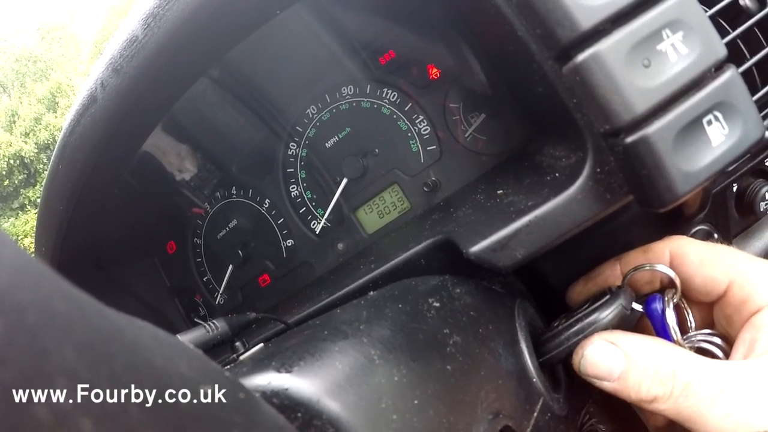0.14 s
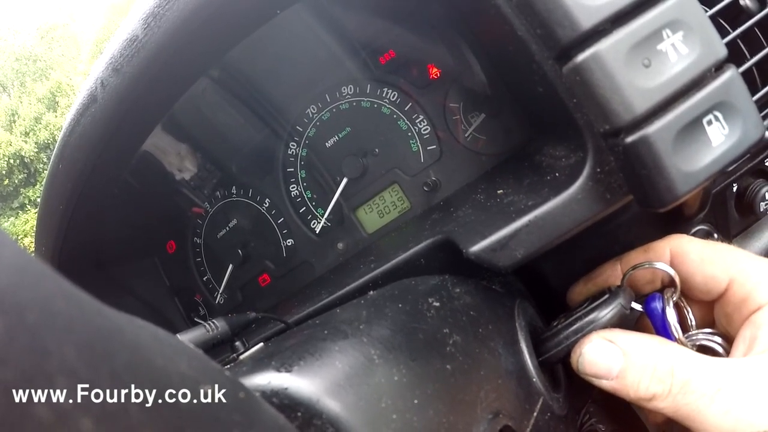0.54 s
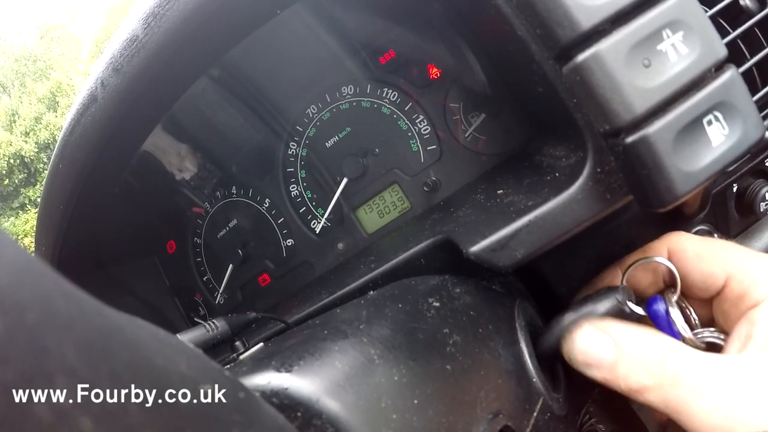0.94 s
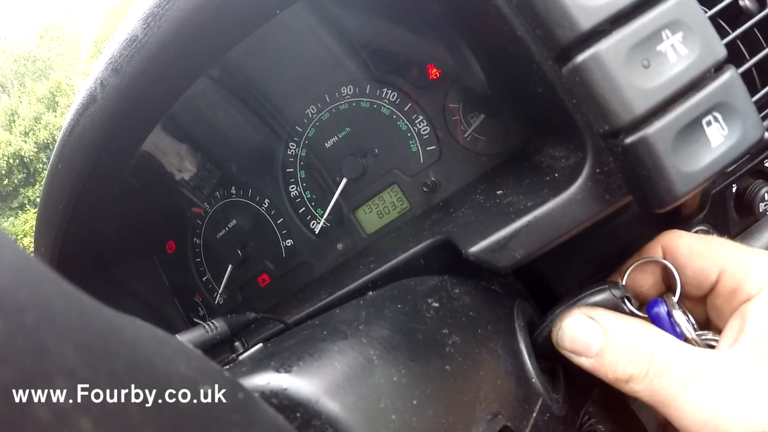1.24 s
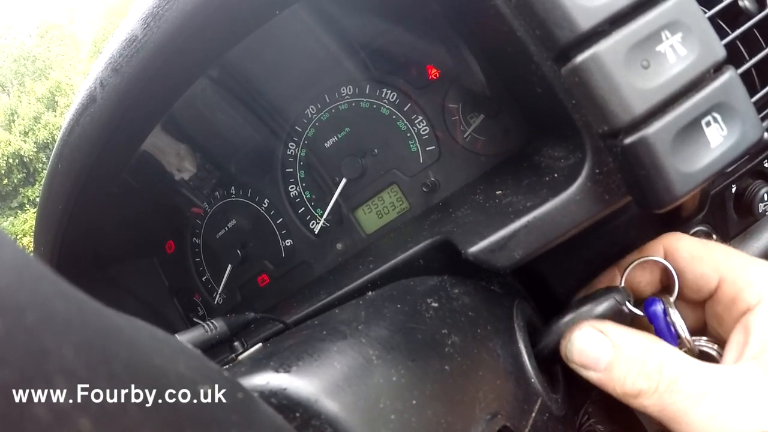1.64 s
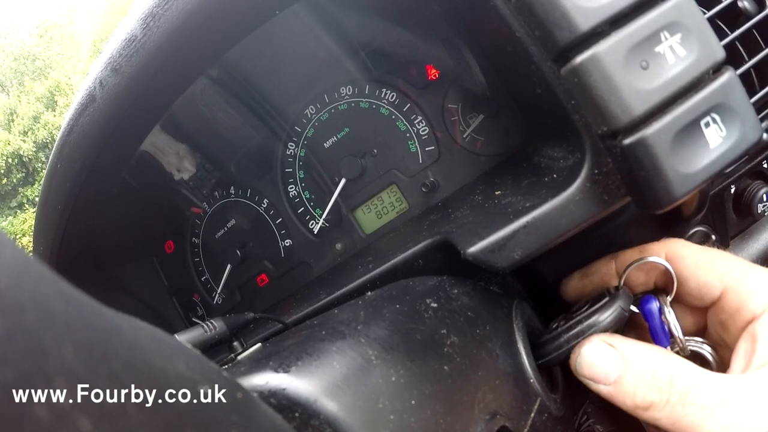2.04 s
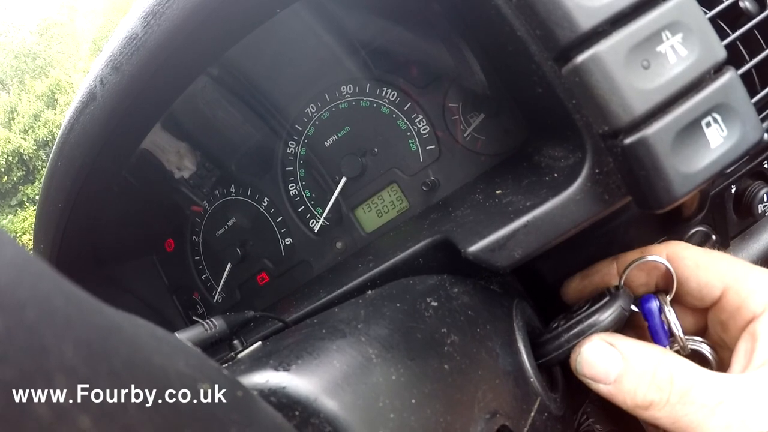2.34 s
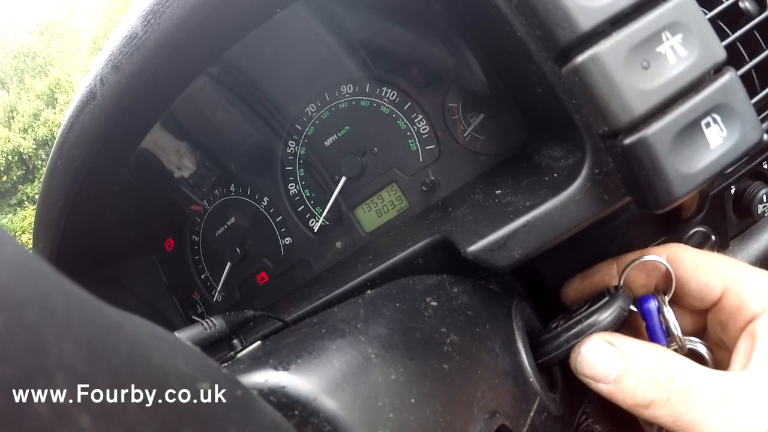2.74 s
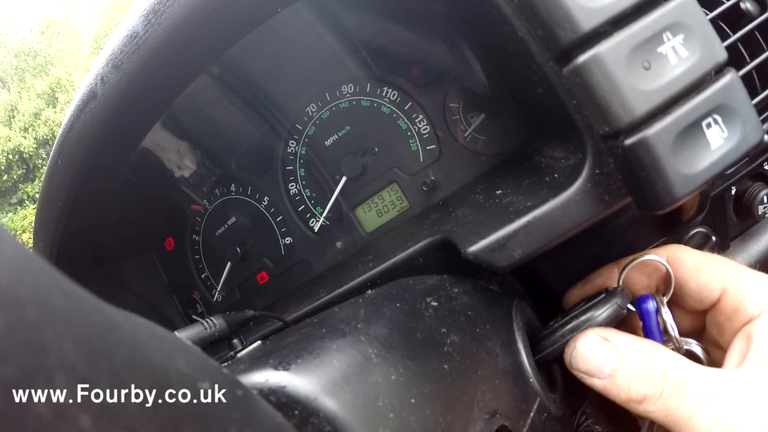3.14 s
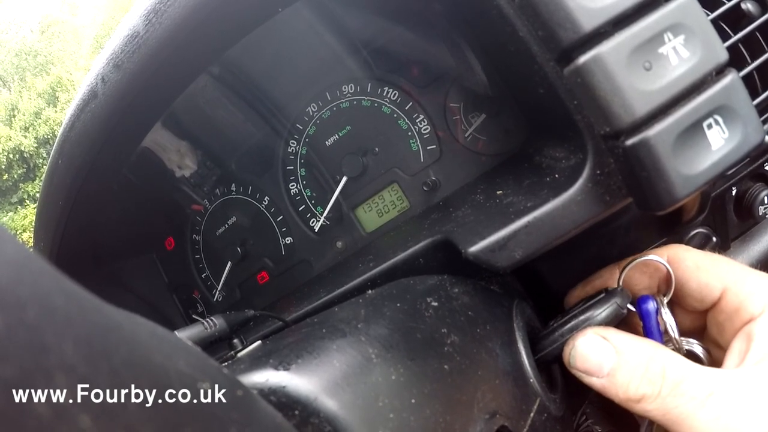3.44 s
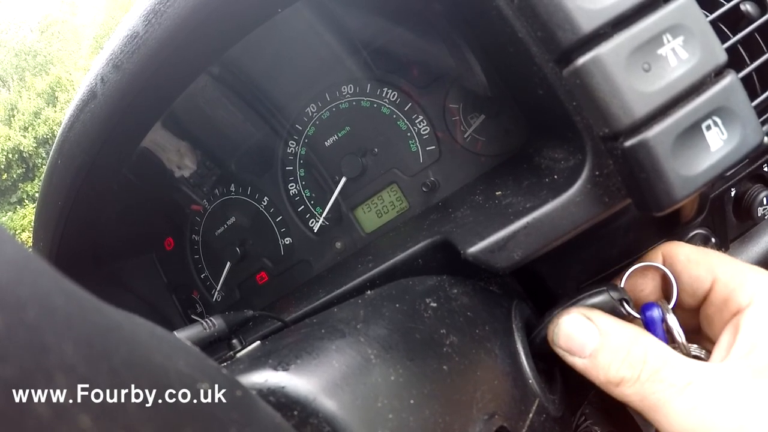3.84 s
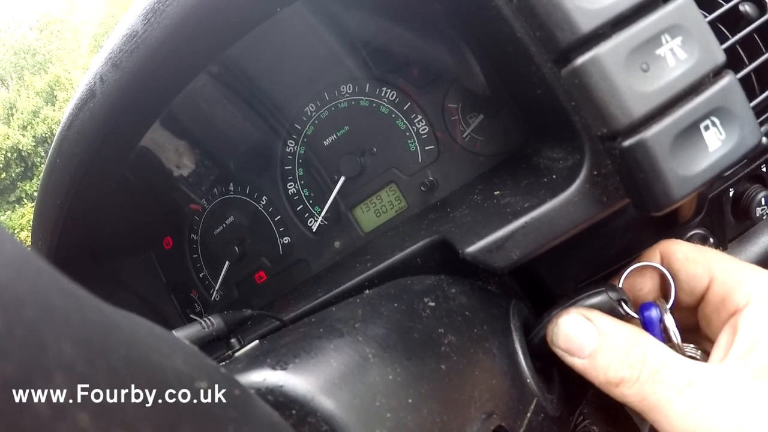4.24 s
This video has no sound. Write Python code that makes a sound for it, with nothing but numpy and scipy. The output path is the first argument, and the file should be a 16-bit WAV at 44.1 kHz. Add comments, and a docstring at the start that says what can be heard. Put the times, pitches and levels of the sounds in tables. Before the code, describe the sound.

Close, dry cabin sound in one channel. A faint rattly buzz of about fifty pulses a second runs, stops after about one second, restarts before two and stops again near four. Each change comes with gritty lock scraping, small metallic key clinks and a low jolt, the last one heaviest. A fifth to a quarter second later a solenoid clicks, hardest and brightest in the middle. Soft background noise and wavering hum.

```python
"""Inside a parked car an ignition key is switched off, on and off again.
A small electric pump buzzes while the ignition is on: each turn knocks its resonances.
Gritty noise makes the lock scrape, ringing modes and ticks make the keys clink and the lock's detent click,
and deep noise thuds. About a fifth to a quarter of a second after each turn a solenoid clicks: a noise crack
and ringing modes. Behind it lie soft noise and a faint low hum."""
import sys
import numpy as np
from scipy import signal
from scipy.fft import rfft, irfft, next_fast_len
from scipy.io import wavfile
from scipy.ndimage import uniform_filter1d

SR = 44100
rng = np.random.default_rng(int(sys.argv[2]) if len(sys.argv) > 2 else 0)


def dump(signal):
    """Clip the signal to [-1, 1] and save it as 16-bit WAV at the path in sys.argv[1]."""
    limited = np.clip(np.atleast_2d(signal).T, -1, 1)
    pcm = np.round(limited * 32767).astype(np.int16)
    wavfile.write(sys.argv[1], SR, pcm)


N = 193025
T = np.arange(N) / SR  # seconds
RING_T = T[:SR // 3]  # time within one short sound, seconds

# The times when the ignition is on and the pump runs; a negative start lies before the sound begins.
# Each row: switched on in seconds, switched off in seconds.
PUMP_RUNS = [(-1.9253, 1.04), (1.76, 3.765)]
# Resonances of the pump and its mounting: a low drone and a high rattle.
# Each row: frequency in Hz, width in Hz, relative level in dB, delay in seconds after each turn's knock.
PUMP_RESONANCES = [(242, 46, -11, 0.0017), (372.7, 35, -4.5, 0.0053), (466, 40, -8, 0.0121),
                   (567, 33.6, 2.5, 0.00995), (680.7, 37, 4, 0.01), (957.7, 51.7, 2, 0.006),
                   (1063, 101, -4.5, 0.0019), (1178, 25, -10, 0.0025), (1467, 38, -9.5, 0.0034),
                   (1771, 19, -6.5, 0.0048), (2001, 66, -3, 0.00396), (2244, 169, -6.5, 0.00206),
                   (2368, 57.5, -2, 0.00051), (2400, 41, -11.5, 0.00742), (2785, 23, -10, 0.0011),
                   (3026, 41, -12, 0.0033), (3152, 600, -19, 0.00113), (3544, 110, -13, 0.0077),
                   (4880, 660, -31, 0.0067), (5130, 810, -30, 0.00044)]
# Turns per second at switch-on and at full speed, time constant of the climb, slowing once switched off
PUMP_START_HZ, PUMP_TOP_HZ, PUMP_CLIMB_S, COAST_HZ_PER_S = 41.15, 51.229, 1.1915, 39
KNOCK_PHASE = .515  # share of a turn at which the knock falls
# Rattle: level at full speed, change with speed, extra level at switch-on and its fading time, decay once off
RATTLE_DB, RATTLE_DB_PER_HZ, SURGE_DB, SURGE_S, RATTLE_T60_S = -56.5, 0.9, 8, 0.47, .42
# Drone: level at full speed, change with speed, decay once off
DRONE_DB, DRONE_DB_PER_HZ, DRONE_T60_S = -60.5, -0.02, 1.3
# The drone is weaker until the pump takes up its load: by how much, for how long, how gradually that ends
UNLOADED_DB, LOAD_AFTER_S, LOAD_RAMP_S = -7.5, .62, 0.04


def pump(on, off, scatter_db=0.9, hiss_db=-17, shaft_db=-61.0):
    """The pump climbs towards full speed, then coasts; each turn knocks its resonances and hisses a little."""
    age = np.maximum(T - on, 0)
    coasting = np.maximum(T - off, 0)
    lacking_hz = (PUMP_TOP_HZ - PUMP_START_HZ) * np.exp(-age / PUMP_CLIMB_S)
    speed = (T >= on) * np.maximum(PUMP_TOP_HZ - lacking_hz - COAST_HZ_PER_S * coasting, 0)
    # turns already made if the pump was running before the sound begins
    gained_hz = PUMP_TOP_HZ - PUMP_START_HZ - lacking_hz[0]
    earlier_turns = PUMP_TOP_HZ * age[0] - PUMP_CLIMB_S * gained_hz
    turns = earlier_turns % 1 + np.cumsum(speed) / SR - KNOCK_PHASE

    # one knock a turn, shared between two neighbouring samples
    knock_at = np.interp(np.arange(int(turns[-1])), turns, np.arange(N))
    sample, part = knock_at.astype(int), knock_at % 1
    force = undb(scatter_db * rng.standard_normal(len(knock_at)))
    knocks = np.bincount(sample, force * (1 - part), N)
    knocks = knocks + np.bincount(sample + 1, force * part, N)
    drone = knocked(knocks, [row for row in PUMP_RESONANCES if row[0] < 820])
    rattle = knocked(knocks, [row for row in PUMP_RESONANCES if row[0] >= 820])

    hiss_colour = [(200, -42), (700, -21), (2300, 8.5), (5000, 1.5), (9000, -7.5), (15000, -34)]
    hiss = np.cos(np.pi * (turns - .2)) ** 2 * noise(hiss_colour)
    shaft = -np.sin(2 * np.pi * turns)

    unloaded = .5 - .5 * np.tanh((age - LOAD_AFTER_S) / (2 * LOAD_RAMP_S))  # 1 falling to 0
    drone_gain = undb(DRONE_DB - DRONE_DB_PER_HZ * lacking_hz + UNLOADED_DB * unloaded)
    surge_db = SURGE_DB * np.exp(-age / SURGE_S)
    rattle_gain = undb(RATTLE_DB - RATTLE_DB_PER_HZ * lacking_hz + surge_db)
    bright = rattle_gain * (rattle + undb(hiss_db) * unit(hiss))
    driven = (bright + undb(shaft_db) * shaft) * decay(coasting, RATTLE_T60_S)
    low = drone_gain * drone * decay(coasting, DRONE_T60_S)
    return (T >= on) * (driven + low)


def knocked(knocks, resonances):
    """Knocks ringing a set of pump resonances; rms near 1 at full speed."""
    response = sum(undb(db) * resonance(hz, width, lag) for hz, width, db, lag in resonances)
    full_speed_rms = np.sqrt(np.sum(response ** 2) * PUMP_TOP_HZ / SR)
    return signal.oaconvolve(knocks, response)[:N] / full_speed_rms


def resonance(hz, width, lag, in_step_s=.0038):
    """One knock's response swells after its lag and dies away; all swing in step at in_step_s, a bright chirp."""
    rate = 2 * np.pi * width
    age = np.maximum(RING_T - lag, 0)
    swelling = 2 / SR * rate ** 2 * age * np.exp(-rate * age)  # gain 1 at the centre frequency
    return swelling * np.sin(2 * np.pi * hz * (RING_T - in_step_s))


# The turns of the key.
# Each row: time in seconds, half length of the scrape in seconds, scrape level in dB,
# jolt level in dB, length of the jolt in seconds.
KEY_TURNS = [(1.1, 0.011, -47, -40, 0.097), (1.77, 0.0098, -49, -42, 0.083),
             (3.836, 0.0066, -43.5, -26, .135)]
# The barrel catches briefly as the hand takes up the slack. Each row: time in seconds, level in dB.
CATCHES = [(0.759, -55), (1.031, -49.5), (1.658, -56.5), (1.74, -49.5), (3.691, -59), (3.755, -52)]
# Tone of the barrel's hollow body. Each row: frequency in Hz, relative level in dB.
SCRAPE_BODY = [(100, 5.5), (220, -1), (300, 7.5), (400, 1.5), (550, 0.5), (850, -4), (1000, 1.5),
               (1250, 2.5), (1500, -2.5), (2000, -8.5), (4000, -34)]
# Tone of the barrel's high rasp. Each row: frequency in Hz, relative level in dB.
SCRAPE_RASP = [(600, 13), (1500, -28), (2100, 8), (3200, 2.5), (4200, -0.5), (5500, -2.5), (7000, -8),
               (8500, -19.5), (15000, -31)]
CATCH_HALF_S, RASP_DB = 0.0084, -4.5  # half length of a catch; rasp against body
# The barrel rubs on softly after each turn: delay, half length, level against the scrape
RUB_LAG_S, RUB_HALF_S, RUB_DB = .02, .022, -9


def lock():
    """The barrel catches, scrapes round and rubs on; each gritty stroke has a hollow body and a high rasp."""
    catches = strokes([(s, CATCH_HALF_S, db) for s, db in CATCHES])
    scrapes = strokes([(s, half, db) for s, half, db, *_ in KEY_TURNS])
    rubs = strokes([(s + RUB_LAG_S, RUB_HALF_S, db + RUB_DB) for s, _, db, *_ in KEY_TURNS])
    body = grit(SCRAPE_BODY, grain_db=3)
    rasp = grit(SCRAPE_RASP, grain_db=-6)
    return (catches + scrapes + rubs) * (body + undb(RASP_DB) * rasp)


# Keys and ring knocking together, and at 3.684 s a dull click of the lock's detent.
# Each row: time in seconds, ring level in dB, tick level in dB, treble lift in dB per octave.
CLINKS_AND_CLICK = [(1.05, -50, -33, -9), (1.073, -47, -52, -11), (1.11, -47.5, -40.5, -13),
                    (1.7662, -45, -38, -2), (1.778, -41, -45, 1), (1.79, -41, -58, 0),
                    (1.81, -37, -34.5, -4.5), (3.6841, -61, -33.5, -24.5), (3.8074, -43.5, -46.5, 1),
                    (3.8957, -56, -53, -6), (3.9305, -55, -60, -12)]
# Ringing modes of the keys. Each row: frequency in Hz, time to fall 60 dB in seconds, relative level in dB.
KEY_MODES = [(2940, 0.044, -20.5), (4350, 0.044, -21), (5420, 0.017, -3.5), (5860, 0.056, -7),
             (6840, 0.03, -14), (9100, 0.025, -29), (10130, 0.084, -19.5), (11200, 0.017, -4),
             (12400, 0.039, -14), (11930, 0.027, -5.5), (13250, 0.029, -20), (14600, 0.048, -21)]
# Tone of the keys sliding along the ring. Each row: frequency in Hz, relative level in dB.
SLIDE_COLOUR = [(500, -10), (2500, -10), (4400, 5), (6800, 2), (8300, -2), (10200, 0.5), (11800, -5),
                (12500, -2), (13900, -8), (14600, -12), (15500, -10)]
REBOUND_S, REBOUND_DB = .0052, -6.5  # every knock bounces once
# A slide follows each knock: delay, half length, level against tick level plus treble lift
SLIDE_LAG_S, SLIDE_HALF_S, SLIDE_DB = 0.012, 0.0057, -11


def keys_and_detent(scatter_db=2.5, tick_t60=0.01):
    """Knock and rebound each tick and ring: keys damped by the hand, their mix of modes set by the point of
    contact, and the detent's dull click made the same way with its treble cut."""
    out = np.zeros(N)
    tick_colour = [(300, -8.5), (1500, -11.5), (2500, -8), (6500, 5), (8300, -4.5), (11500, 3.5), (15500, -1)]
    for s, ring_db, tick_db, lift_db in CLINKS_AND_CLICK:
        # the lift tilts the tick only above 2500 Hz
        lifted = [(hz, db + lift_db * np.log2(max(hz, 2500))) for hz, db in tick_colour]
        for lag, gain in [(0, 1), (REBOUND_S, undb(REBOUND_DB))]:
            ring = np.zeros(len(RING_T))
            for hz, t60, db in KEY_MODES:
                mode_db = db + lift_db * np.log2(hz / 7000) + scatter_db * rng.standard_normal()
                ring += undb(mode_db) * mode(hz, t60, 8.0)
            tick = fade(tick_t60, 0.000082) * noise(lifted, len(RING_T))
            add(out, s + lag, gain * (undb(ring_db) * ring + undb(tick_db) * tick))
    # harder, brighter knocks slide louder; after the dull detent click it is very faint
    slides = strokes([(s + SLIDE_LAG_S, SLIDE_HALF_S, tick_db + lift_db + SLIDE_DB)
                      for s, _, tick_db, lift_db in CLINKS_AND_CLICK])
    return out + grit(SLIDE_COLOUR, grain_db=-5.5) * slides


# The solenoid's clicks. Each row: time in seconds, level in dB, stroke (0 drops out, 1 pulls in).
SOLENOID_CLICKS = [(1.2971, -34, 0), (2.0369, -31, 1), (4.0181, -34.5, 0)]
# Ringing modes of the solenoid and the panel it sits on.
# Each row: frequency in Hz, time to fall 60 dB in seconds, relative level in dB dropping out, then pulling in.
SOLENOID_MODES = [(321.5, 0.14, 2, -5), (368, 0.11, 0.5, -4), (411, 0.059, 0.5, -3), (722, 0.08, -5.5, -19),
                  (919, 0.045, -3.5, -5), (1070, 0.032, 5, -12), (1170, 0.034, 6, -11), (1334, 0.016, 8, 6),
                  (1460, 0.017, 8, -14), (1660, 0.056, -8, -23), (2205, 0.013, -2, -23),
                  (2370, 0.054, -18, -22), (3050, 0.023, -15, -5), (3483, 0.022, -12.5, 1),
                  (4420, 0.017, -7.5, 6), (4720, 0.011, -6.5, 3), (4900, 0.019, -27, -22),
                  (6100, 0.029, -32, -20), (7060, 0.032, -24, -8.5)]
# Tone of the contact's crack: one list for dropping out, one for pulling in.
# Each row of a list: frequency in Hz, relative level in dB.
CRACK_COLOURS = [
    [(150, 10), (600, -6), (1200, 2), (2500, -7), (5000, -11.5), (8000, -22.5), (15000, -35)],
    [(150, 9), (600, -17), (1500, -1), (3200, -7), (5000, 7), (8000, -6), (12000, -15.5), (15500, -14)],
]


def solenoid(build_cycles=6.7, drop_crack_db=-1, pull_crack_db=2, drop_t60=0.053, pull_t60=0.033,
             echo_s=0.02, echo_db=-13):
    """Dropping out is a dull clack, pulling in a hard bright snap; the low panel modes swell last."""
    out = np.zeros(N)
    crack_shapes = [undb(drop_crack_db) * fade(drop_t60, 0.0015), undb(pull_crack_db) * fade(pull_t60, 0.0017)]
    echo_colour = [(80, -16), (160, 29), (380, -19), (600, 21), (1300, -22), (2200, -16), (4500, -18.0),
                   (9000, -50)]
    ringing = [mode(hz, t60, build_cycles) for hz, t60, *_ in SOLENOID_MODES]
    for s, db, stroke in SOLENOID_CLICKS:
        k = int(round(stroke))
        body = sum(undb(row[2 + k]) * ring for row, ring in zip(SOLENOID_MODES, ringing))
        crack = crack_shapes[k] * noise(CRACK_COLOURS[k], len(RING_T))
        add(out, s, undb(db) * (body + crack))
        # the cabin throws back a short, duller echo
        echo = fade(0.036, 0.00085) * noise(echo_colour, len(RING_T))
        add(out, s + echo_s, undb(db + echo_db) * echo)
    return out


# Tone of the deep thud. Each row: frequency in Hz, relative level in dB.
THUD_COLOUR = [(8, -1), (18, -1.5), (35, 1.5), (60, -10), (85, -12), (140, -28), (250, -36.5), (500, -39.5),
               (1200, -57), (4000, -79)]
# The hand's jolt builds, holds, then leaves a weaker shudder that dies away
JOLT_ATTACK_S, JOLT_RELEASE_S, SHUDDER_DB, SHUDDER_T60_S = 0.014, 0.031, -10, 2.3


def thuds():
    """At each turn the twisting hand jolts the steering column: a short, deep rumble, then a fading shudder."""
    rumble, out = grit(THUD_COLOUR, grain_db=2), np.zeros(N)
    for s, _, _, db, length in KEY_TURNS:
        after = np.maximum(T - s - length, 0)
        shudder = undb(SHUDDER_DB) * decay(after, SHUDDER_T60_S)
        release = np.maximum(np.exp(-after / JOLT_RELEASE_S), shudder)
        jolt = np.clip((T - s) / JOLT_ATTACK_S, 0, 1) * release
        # evens out the random rumble so that each jolt has its set strength
        strength = np.sqrt(np.average(rumble ** 2, weights=jolt ** 2))
        out += undb(db) * jolt * rumble / strength
    return out


# Tone of the cabin's background noise. Each row: frequency in Hz, relative level in dB per Hz.
CABIN_COLOUR = [(10, -19), (25, -3), (48, 1), (65, 0.5), (88, -17), (150, -20.5), (250, -23.5), (450, -30),
                (1000, -35), (2000, -40.5), (4500, -43.5), (8000, -49.5), (15000, -53)]
# Level of the low hum, before HUM_GAIN_DB is added. Each row: time in seconds, level in dB.
HUM_LEVELS = [(0.0, -63), (2.41, -49.5), (2.73, -53), (3.23, -44.5), (3.45, -52), (4.3, -51.5)]
CABIN_DB, HUM_HZ, HUM_GAIN_DB = -47.5, 70.8, 1


def cabin(waver_db=2.0, waver_hz=0.9, upper_hz=122, upper_db=-64):
    """Soft rumble and hiss under a wavering low hum with a faint upper tone."""
    pitch = HUM_HZ + waver_hz * walk(9)
    level_db = np.interp(T, *np.transpose(HUM_LEVELS)) + HUM_GAIN_DB + waver_db * walk(11)
    hum = np.sqrt(2) * undb(level_db) * np.sin(2 * np.pi * np.cumsum(pitch) / SR)
    upper_gain = undb(upper_db + waver_db * walk(2.7))
    upper = upper_gain * np.sin(2 * np.pi * np.cumsum(upper_hz + walk(4.6)) / SR)
    return undb(CABIN_DB) * noise(CABIN_COLOUR) + hum + upper


def undb(db):
    """Decibels to gain."""
    return 10 ** (np.asarray(db) / 20)


def unit(x):
    """Scale to rms 1."""
    return x / np.sqrt(np.mean(x ** 2))


def colour(x, points):
    """Filter by (Hz, dB) points joined on a log-frequency axis."""
    hz, db = np.transpose(points)
    f = np.maximum(np.fft.rfftfreq(len(x), 1 / SR), 1)
    gain = undb(np.interp(np.log(f), np.log(hz), db))
    return irfft(rfft(x) * gain, len(x))


def noise(points, size=N):
    """Coloured noise of rms 1."""
    white = rng.standard_normal(next_fast_len(size))
    return unit(colour(white, points)[:size])


def grit(points, grain_db):
    """Friction noise of uneven millisecond grains."""
    grains = rng.standard_normal(N) * undb(grain_db * walk(900))
    padded = np.pad(grains, (0, next_fast_len(N) - N))
    return unit(colour(padded, points)[:N])


def walk(rate):
    """Random wandering of rms 1, with about `rate` new values a second, smoothed together."""
    k = int(SR / rate)
    steps = np.repeat(rng.standard_normal(N // k + 1), k)
    return unit(uniform_filter1d(steps, k)[:N])


def decay(age, t60):
    """Gain that falls by 60 dB every t60 seconds."""
    return np.exp(-np.log(1000) * age / t60)


def fade(t60, rise):
    """Envelope of a blow: builds up with time constant rise, in seconds, then dies away."""
    return (1 - np.exp(-RING_T / rise)) * decay(RING_T, t60)


def mode(hz, t60, build_cycles):
    """One ringing mode that takes a few cycles to build up."""
    return fade(t60, build_cycles / hz) * np.sin(2 * np.pi * (hz * RING_T + rng.random()))


def swell(s, half_length):
    """A bell-shaped envelope in time."""
    return np.exp(-.5 * ((T - s) / half_length) ** 2)


def strokes(table):
    """Sum of the swells in a table of (s, half length s, dB)."""
    return sum(undb(db) * swell(s, half) for s, half, db in table)


def add(out, s, sound):
    """Mix a sound in at time s."""
    i = int(s * SR)
    out[i:i + len(sound)] += sound[:N - i]


def scene():
    """All the sources together, in one channel."""
    pumps = sum(pump(on, off) for on, off in PUMP_RUNS)
    return (pumps + lock() + keys_and_detent() + solenoid() + thuds() + cabin())[None]


def record(dry):
    """A steep low-pass filter cuts the treble above 15300 Hz."""
    low_pass = signal.ellip(10, .2, 70, 15300, fs=SR, output="sos")
    return signal.sosfilt(low_pass, dry)


dry = scene()
out = record(dry)
dump(out)
```